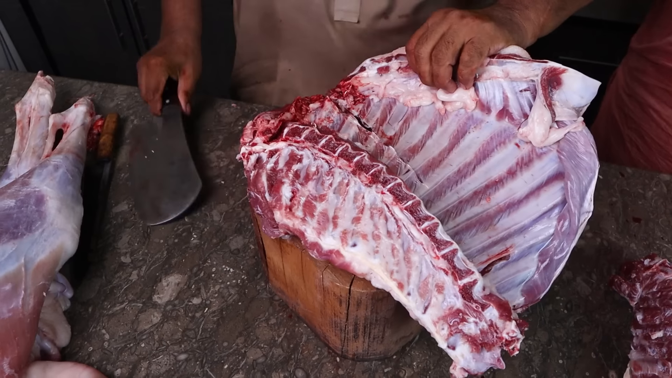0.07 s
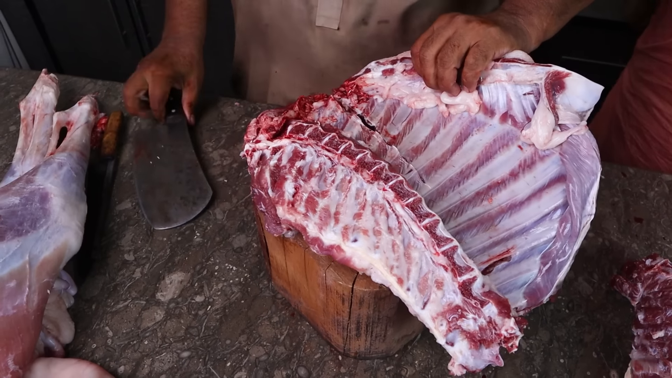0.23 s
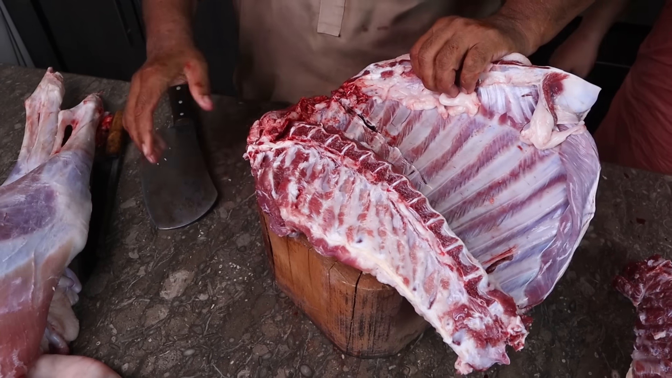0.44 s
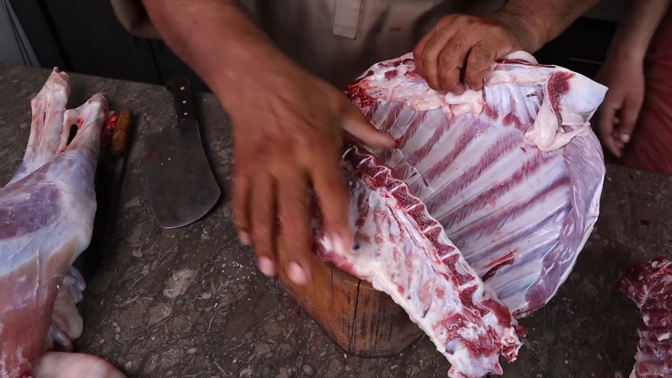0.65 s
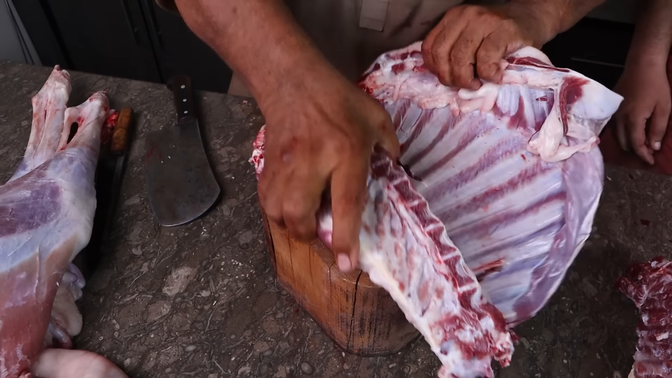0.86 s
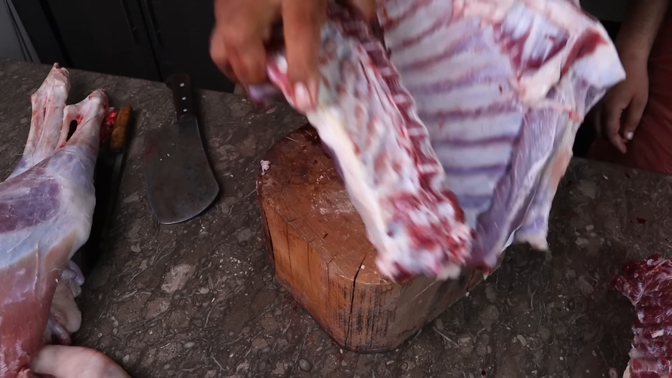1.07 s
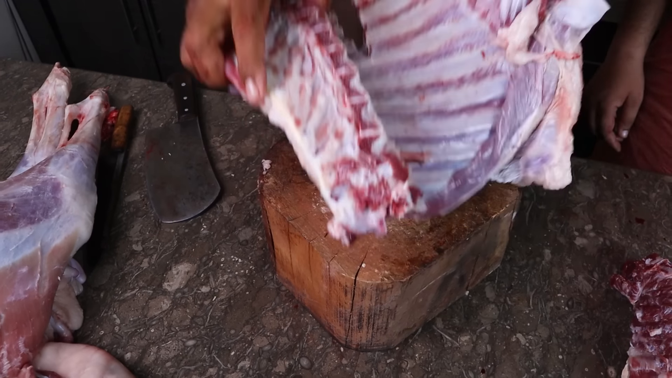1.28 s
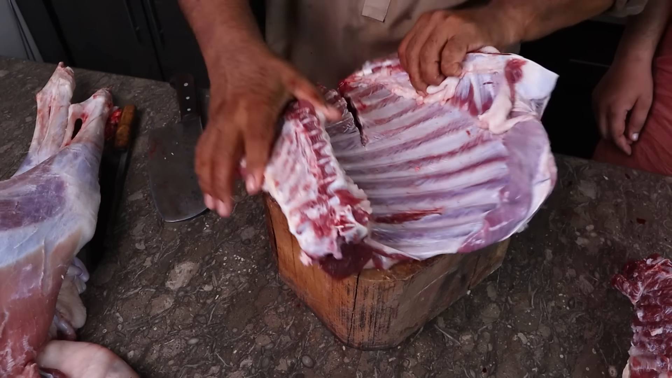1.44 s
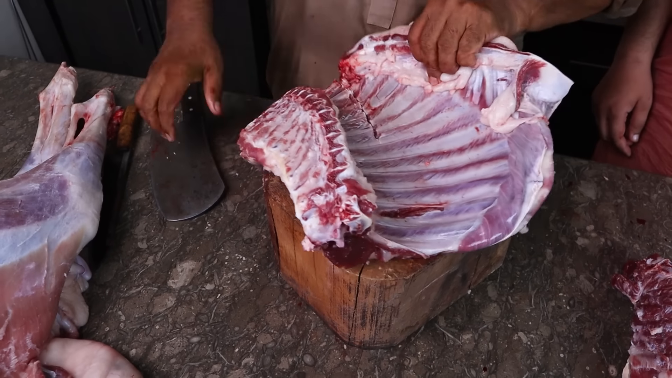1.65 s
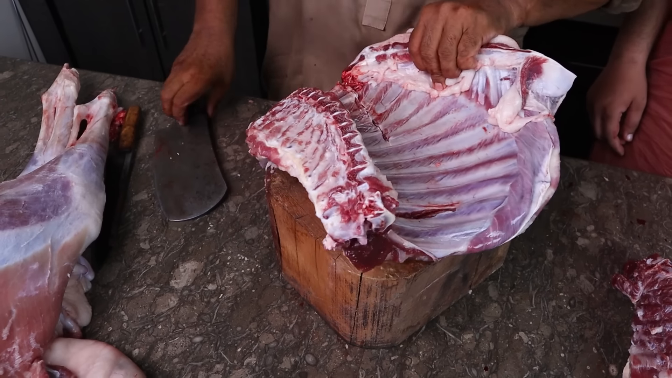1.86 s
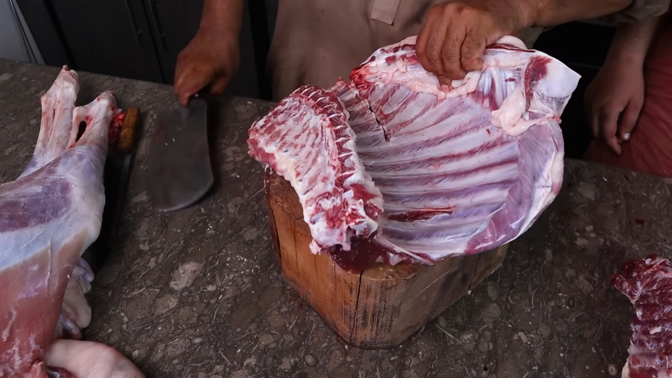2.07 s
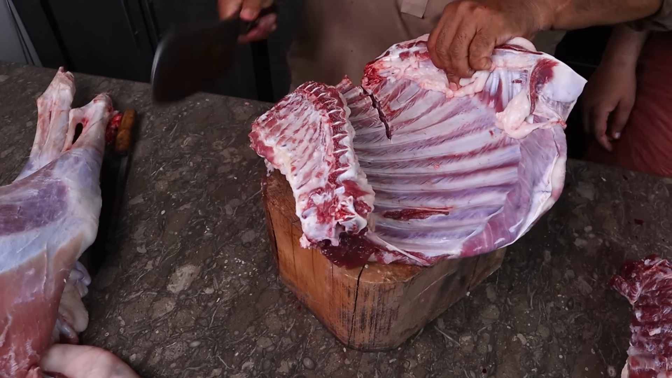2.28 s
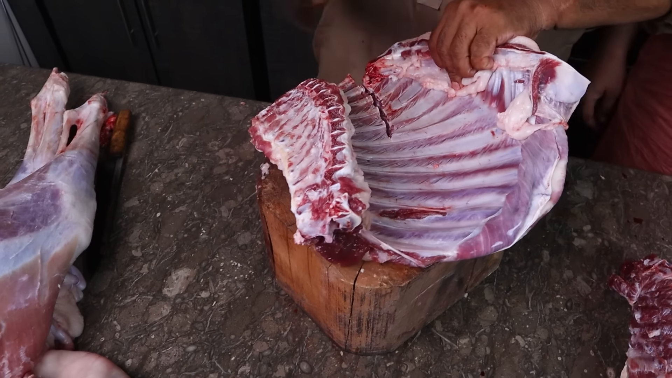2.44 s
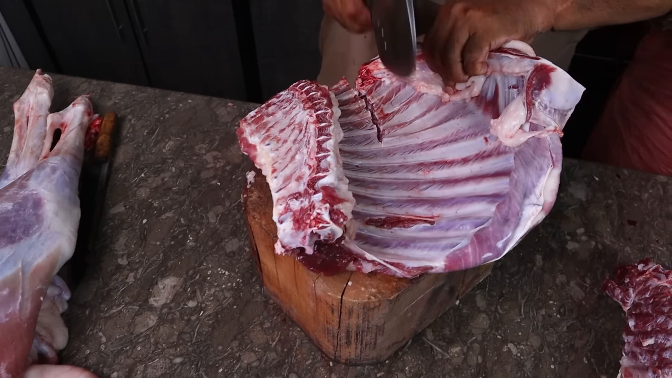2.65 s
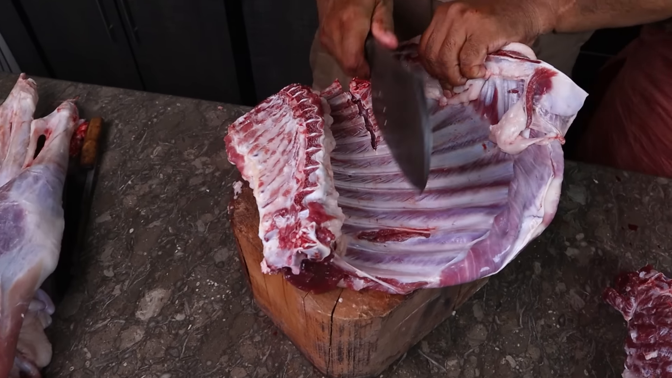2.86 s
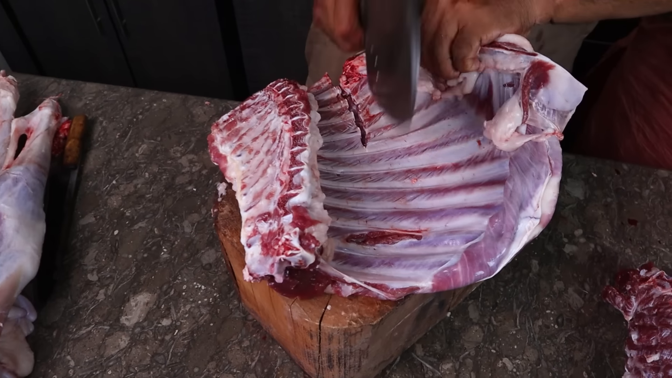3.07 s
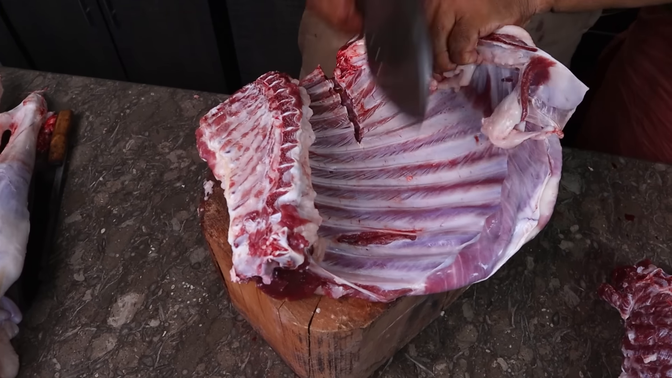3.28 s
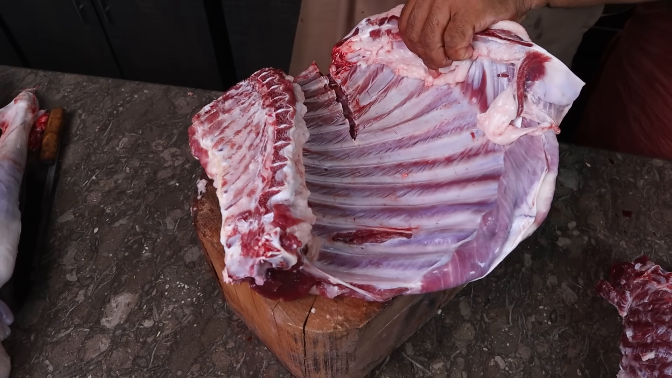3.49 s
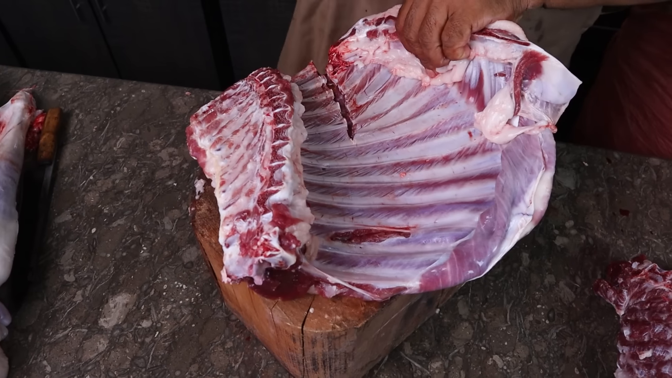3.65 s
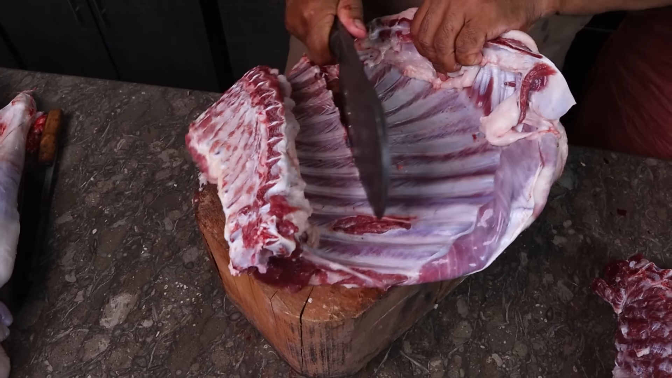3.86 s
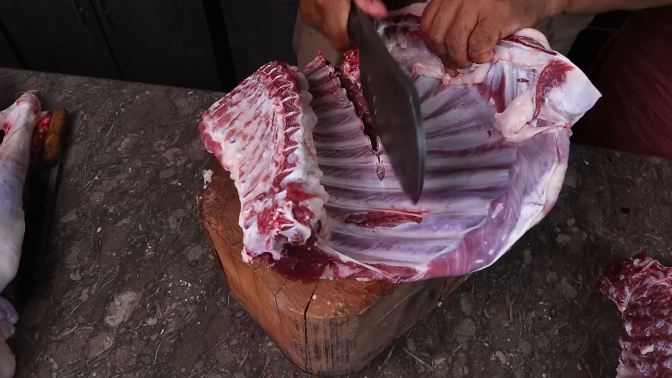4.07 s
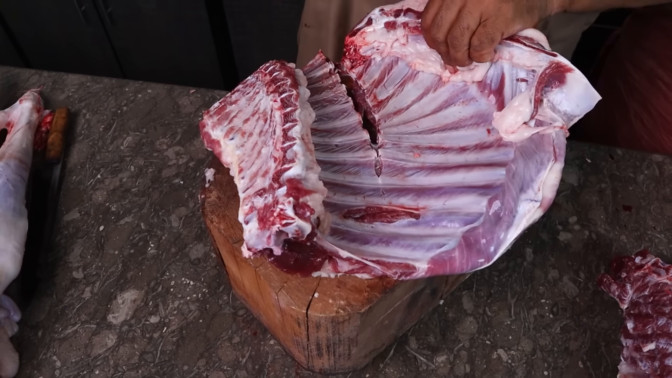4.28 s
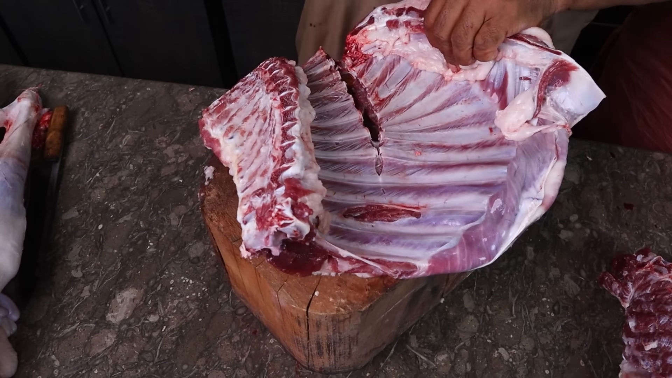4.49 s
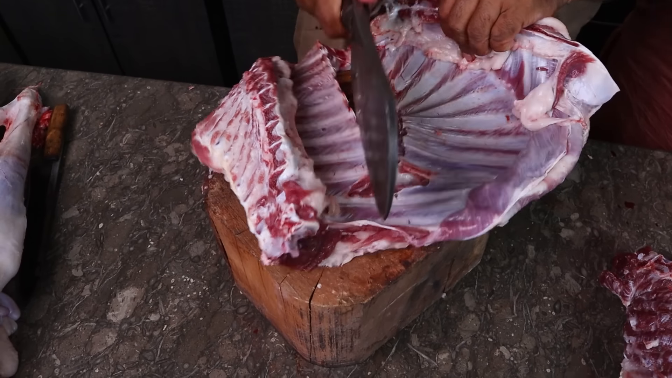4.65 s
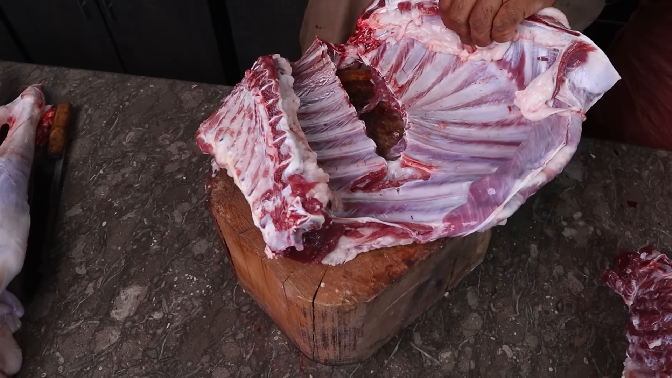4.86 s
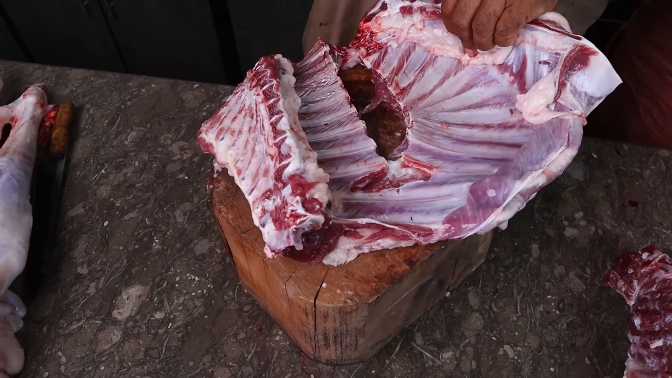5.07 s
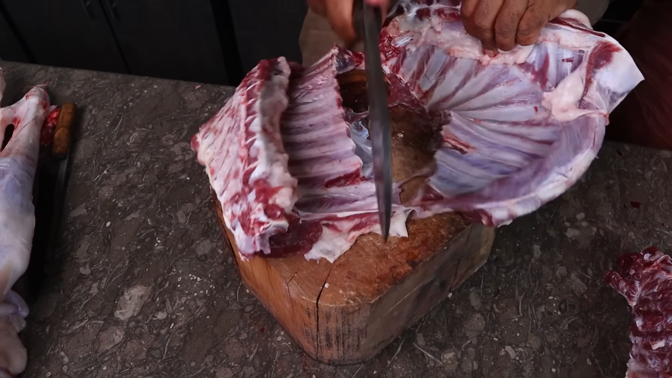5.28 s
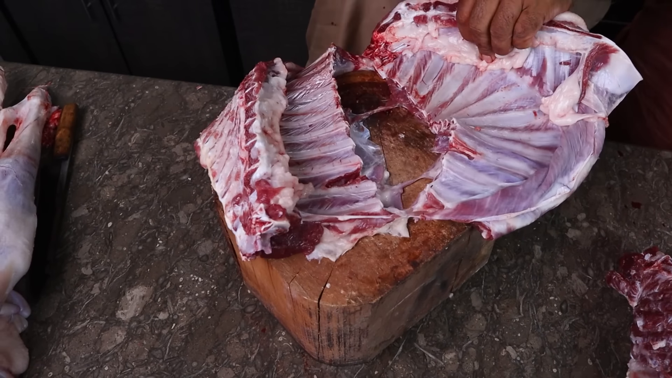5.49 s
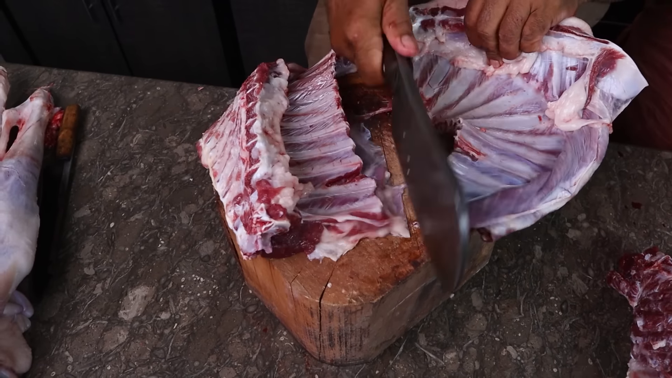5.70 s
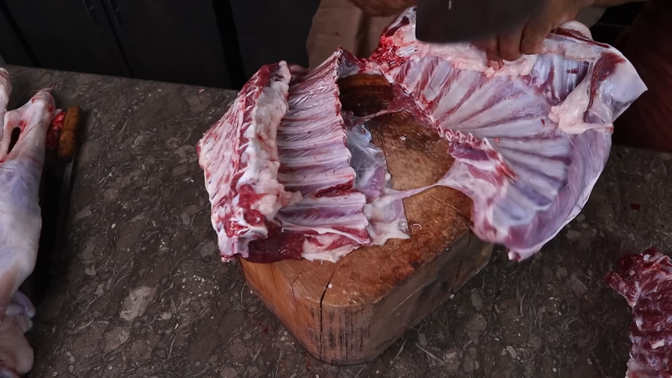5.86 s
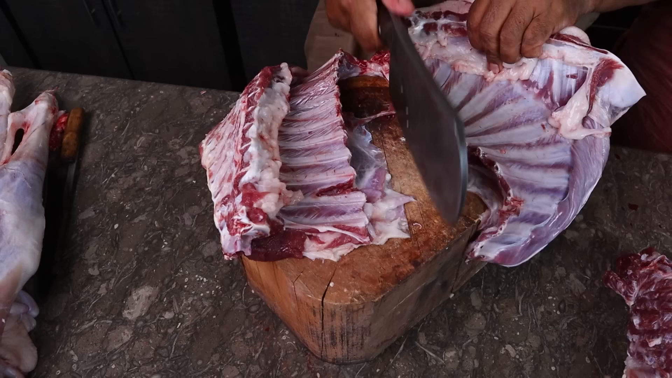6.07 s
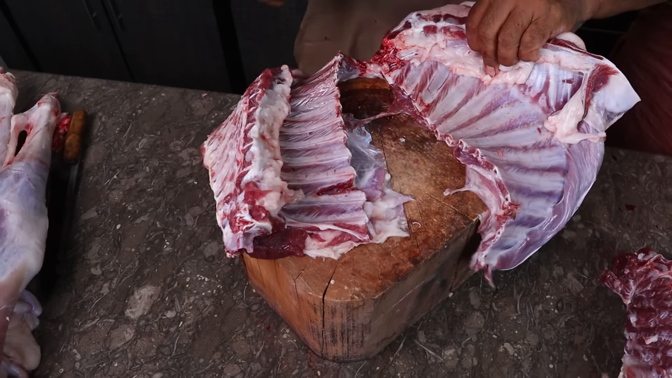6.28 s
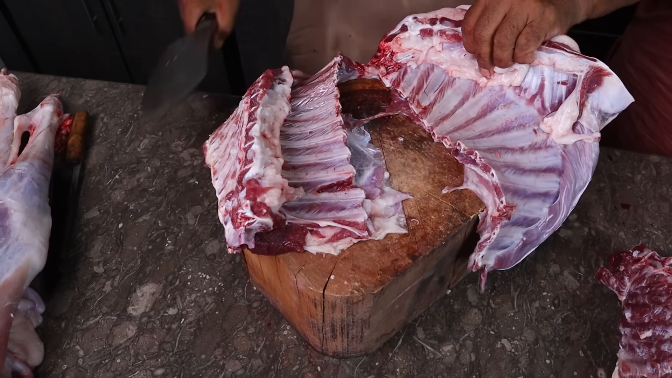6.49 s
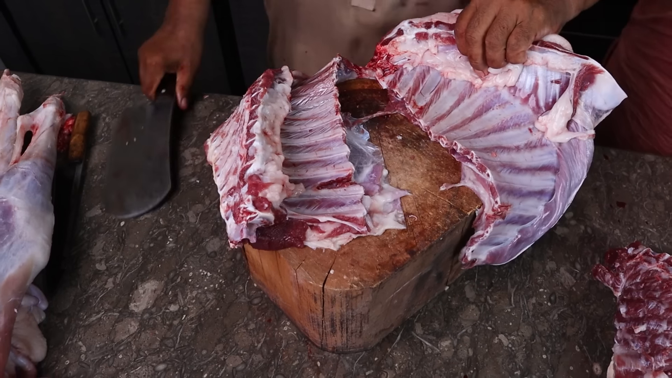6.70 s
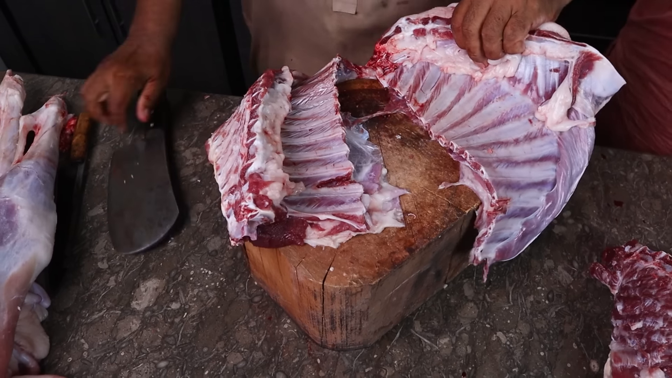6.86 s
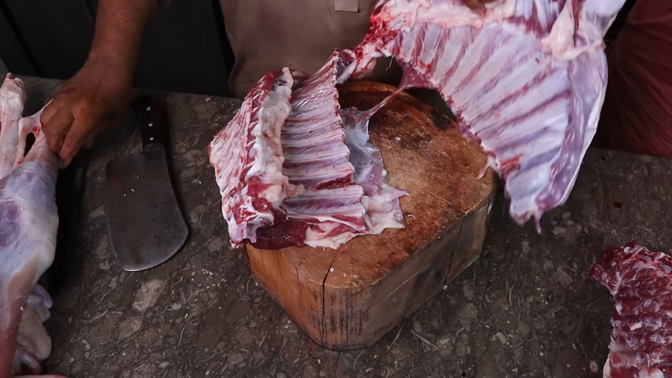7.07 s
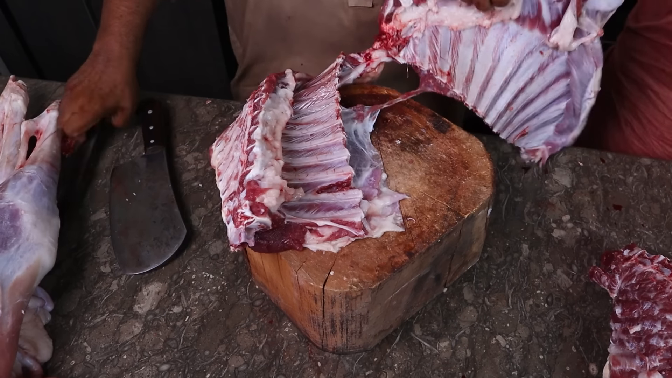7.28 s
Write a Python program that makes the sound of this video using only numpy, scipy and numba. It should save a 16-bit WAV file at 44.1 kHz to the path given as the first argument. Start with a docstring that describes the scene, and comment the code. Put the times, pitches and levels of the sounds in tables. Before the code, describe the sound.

Close up in a reverberant, hard-walled room, a butcher sets down a ringing cleaver, moves wet ribs with quiet squelches and picks the blade up again. After a faint thin whistle comes one light chop, then five heavy ones, each splintering bone and thudding into a wooden block, the last ones hollower. The cleaver finally clatters onto the bench. A distant wash of street noise runs underneath.

```python
"""Chopping ribs on a butcher's block

Close microphone at the bench, in a hard-walled room with a street faint outside. A butcher lays down
a heavy cleaver, shifts a rack of ribs, chops through it in six strokes and lays the cleaver down again.
Each stroke cracks bone and drives into the wooden block: a dull thump through meat, a hollow knock on
bare wood. The steel and the room ring on; gain control flattens the blows and ducks the background."""
import sys
import numpy as np
from scipy import signal
from scipy.fft import rfft, irfft
from scipy.io import wavfile
from numba import njit

SR = 44100
rng = np.random.default_rng(int(sys.argv[2]) if len(sys.argv) > 2 else 0)


def wav_out(sig):
    """Save sig, one row per channel (or a flat mono array), as 16-bit PCM at SR to the path in sys.argv[1]."""
    wavfile.write(sys.argv[1], SR, np.round(np.clip(np.atleast_2d(sig).T, -1, 1) * 32767).astype(np.int16))


N = 323416

# The six strokes. Each row: start in seconds, force on the block in dB, cushion of meat under the edge
# from 0 to 1, bone crack in dB, crack length in seconds, blade ring in dB.
STROKES = [(3.2817, -23.5, 1, -22.5, 0.0024, -42), (3.9320, 3, 0.79, -4.5, 0.0021, -32),
           (4.7067, 5.5, 0.66, -10.5, 0.016, -48), (5.3328, 5, 0.29, -15.5, 0.0049, -46),
           (5.8494, 4, .1, -12, 0.0022, -54), (6.18, 1.5, 0.15, -22, .002, -36)]
# Modes of the steel blade. Each row: pitch in Hz, relative level in dB, 60 dB decay time in seconds.
BLADE_MODES = [(1292, -3, .3), (2075, 0, .27), (4190, -5.5, .22), (4793, 4.5, .34), (5380, -10, .28),
               (6732, -7, .26), (10822, -6, .22), (12903, -4.5, .24), (1464, -11, .25), (1680, -8, .25),
               (2035, -3, .2), (2832, -6, .22), (3155, -9, .25), (3424, -10, .2), (4958, -7, .18),
               (5800, -12, .15), (6971, -12, .22), (7560, -12, .2), (8936, -11, .15), (9820, -14, .2),
               (11560, -14, .2)]
# Bright colour of splinters, crackle and chatter. Each row: frequency in Hz, gain in dB.
SPLINTER_COLOUR = [(100, -55), (800, 5.5), (2000, 14.5), (3200, 11), (5300, 9.5), (8000, 4), (12000, 5),
                   (16000, -11)]


def chops():
    """The edge splinters through to the block; meat under it swells the thump and muffles the knock."""
    # A blow through meat, and one on bare wood. Each row: frequency in Hz, gain in dB.
    thump_colour = [(30, -65), (60, -17.5), (110, -2), (180, 3.5), (260, -1), (360, -2.5), (550, -10.5),
                    (1000, -16.5), (2000, -37.5), (6000, -35), (16000, -66)]
    knock_colour = [(40, -36.5), (150, -18), (300, -5.5), (420, 4), (560, 3.5), (720, 0), (1000, -4),
                    (1800, -11.5), (3000, -23), (6000, -46.5), (16000, -43)]
    # The block bouncing on the bench, and the wood's own modes.
    # Each row: pitch in Hz, relative level in dB, 60 dB decay time in seconds.
    bench_modes = [(71, -9, 0.26), (104.75, -7, 1), (141.6, 2, 0.3), (180, -1.5, 0.16), (197.5, -3, 0.21),
                   (229, -21, 0.34), (271, 4.5, 0.36), (353, 6, 0.12), (384, -0.5, 0.2)]
    block_modes = [(275, -5, .5), (404, -2, .14), (522, 0, .3), (543, -1, .26), (590, -2, .14),
                   (633, 1, .14), (720, 1, .14), (764, -3, .2), (833, -4, .14), (1033, -7, .14),
                   (1253, -8, .18)]
    out = np.zeros(N)
    for at, force_db, cushion, crack_db, length, _ in STROKES:
        landing = at + travel_time(cushion)
        splinter_db = crack_db - 8.5
        splinters = colour(fracture(length, unevenness=.3), SPLINTER_COLOUR)
        add(out, at, blow(splinters, splinter_db))
        # chips of bone and wet fibres patter after the edge
        patter = colour(fracture(.025, unevenness=.3), SPLINTER_COLOUR)
        add(out, landing, blow(patter, splinter_db - 3.9))
        thump = blow(colour(rattle(t60=0.089), thump_colour), 0)
        thump += blow(ring(bench_modes, unevenness=0.18), -3.5)
        knock = blow(colour(rattle(t60=0.15), knock_colour), 0)
        knock += blow(ring(block_modes, unevenness=0.058), -4.5)
        thump_db, knock_db = -12.5 + 14 * cushion, -6.5 * cushion
        add(out, landing, undb(force_db) * (thump * undb(thump_db) + knock * undb(knock_db)))
    return out


def travel_time(cushion):
    """Seconds from first touch until the edge meets the block; more meat takes longer."""
    return .0007 + .0043 * cushion


def bone_cracks():
    """The ribs snap as the edge first meets them."""
    out = np.zeros(N)
    for at, _, _, crack_db, length, _ in STROKES:
        snaps = fracture(length, unevenness=.3)
        add(out, at, blow(bandpass(snaps, hz=1850, q=1.4), crack_db))
    return out


def bench_contacts():
    """The cleaver always settles the same way: edge, its bounce, handle, its bounce."""
    # The cleaver is laid down. Each row: start in seconds, level in dB.
    set_downs = [(0.2257, -2), (6.7948, 1.5)]
    # Its four touches. Each row: delay in seconds, clack in dB, blade ring in dB,
    # tilt of the ring in dB per octave, handle thud in dB.
    touches = [(0, -16.5, -19, -1.5, -34.5), (.029, -29, -21, 1.5, -33.5), (.2, -40.5, -28.5, -2, -14.5),
               (.24, -36, -28.5, -4.5, -23.5)]
    return [(at + delay, db + clack_db, db + ring_db, tilt, db + thud_db)
            for at, db in set_downs for delay, clack_db, ring_db, tilt, thud_db in touches]


def set_down():
    """The blade clacks and its vibrating steel chatters on the bench; the handle drops after it."""
    # Blade and handle striking the bench. Each row: frequency in Hz, gain in dB.
    clack_colour = [(40, -6), (200, -24.5), (450, 9), (800, 4), (1400, -1), (2500, -2.5), (4000, -11),
                    (7000, -12.5), (12000, -27), (16000, -64)]
    handle_colour = [(40, -50), (110, -13), (200, 0.5), (370, 0.5), (560, -8.5), (1200, -15.5), (2500, -21),
                     (16000, -39)]
    out = np.zeros(N)
    for at, clack_db, ring_db, _, thud_db in bench_contacts():
        add(out, at, blow(colour(rattle(t60=0.037), clack_colour), clack_db))
        chatter = colour(fracture(.07, unevenness=.4), SPLINTER_COLOUR)
        add(out, at, blow(chatter, ring_db - 13))
        add(out, at, blow(colour(rattle(t60=0.13), handle_colour), thud_db))
    return out


def blade_ring():
    """The blade rings freely on the bench; after a stroke, meat smothers its low modes."""
    out = np.zeros(N)
    for at, _, ring_db, tilt, _ in bench_contacts():
        modes = [(hz, db + tilt * np.log2(hz / BLADE_MODES[0][0]), t60) for hz, db, t60 in BLADE_MODES]
        # each mode beats with a weaker twin just above it
        twins = [(hz + 19, db - 10, t60) for hz, db, t60 in modes]
        add(out, at, blow(ring(modes + twins, unevenness=.15), ring_db))
    high_modes = [(hz, db, t60) for hz, db, t60 in BLADE_MODES if hz > 4500]
    for at, _, cushion, _, _, ring_db in STROKES:
        grip_s = 0.029 * (1 - cushion) ** 2  # bare wood holds the edge before the blade can ring
        freed = at + travel_time(cushion) + grip_s
        add(out, freed, blow(ring(high_modes, unevenness=.15), ring_db))
    # the blade rocks, so its ring flutters
    return out * np.exp(.25 * wander(per_second=70))


def shifting_ribs():
    """Wet meat peels off the wood and the ribs creak; meat and hands bump softly on the block."""
    # Each row: start in seconds, length in seconds, level in dB, bright crackle in dB relative to that.
    squelches = [(1.1, 0.011, -31, -10), (1.118, 0.026, -35, -1), (1.473, 0.011, -43.5, -12),
                 (1.559, 0.01, -36.5, -3.5), (1.597, 0.0049, -51, 7.5), (2.944, 0.0024, -40, -20),
                 (5.233, .0033, -49, -14)]
    # Each row: start in seconds, level in dB, centre in Hz.
    bumps = [(.775, -36.5, 120), (1.468, -42.5, 258), (1.876, -33, 284), (2.250, -35.5, 590),
             (2.868, -36, 102), (5.236, -33, 138)]
    out = np.zeros(N)
    for at, length, db, crackle_db in squelches:
        snaps = fracture(length, unevenness=0.55)
        add(out, at, blow(bandpass(snaps, hz=1640, q=1.03), db))
        add(out, at, blow(colour(snaps, SPLINTER_COLOUR), db + crackle_db))
    for at, db, hz in bumps:
        add(out, at, blow(bandpass(rattle(t60=0.09), hz, q=1.4), db))
    return out


def handling():
    """Hand and blade slide with a faint hiss; the lifted blade scrapes off the bench and rings."""
    # Each row: start in seconds, length in seconds, level in dB, centre in Hz.
    slides = [(.074, .12, -55, 12800), (2.013, 0.28, -46, 12200), (2.518, 0.25, -49.5, 9700),
              (6.476, .44, -46, 13240)]
    lift_at, lift_s = 2.096, .28
    out = np.zeros(N)
    for at, length, db, hz in slides:
        add(out, at, swish(length, db, hz, width_hz=2500))
    add(out, lift_at, swish(lift_s, db=-40, hz=4450, width_hz=6000))
    add(out, lift_at + lift_s / 2, blow(ring(BLADE_MODES, unevenness=0.44), -52))
    return out


def whistle():
    """One faint, thin whistle just before the first stroke."""
    # In order: start in seconds, length in seconds, level in dB, centre in Hz, width in Hz.
    note = (3, 0.2, -40.5, 2954, 86)
    out = np.zeros(N)
    add(out, note[0], swish(*note[1:]))
    return out


def room(x):
    """Hard walls give dense reflections whose bass builds late and stays longest, and one dull echo."""
    # Colour of the reverberation. Each row: frequency in Hz, gain in dB.
    tail_colour = [(60, -2.5), (160, 3), (350, -2.5), (700, 1.5), (1500, -3.5), (2500, -4.5), (5000, -2),
                   (14000, -11)]
    # Echo off the far wall. In order: delay in seconds, level in dB, upper edge in Hz.
    far_wall = (0.21, -20.5, 256)
    bass_t60_s, shortening_per_octave, air_absorption_hz = 0.82, 0.075, 21000
    t = clock(1.4)
    spectrum = rfft(rng.standard_normal(len(t)))
    octave = np.log2(np.clip(np.arange(len(spectrum)) * SR / len(t), 125, 16000) / 125)
    tail = 0
    for k in range(8):
        hz = 125 * 2 ** k
        t60 = bass_t60_s * 2 ** (-shortening_per_octave * k) / (1 + (hz / air_absorption_hz) ** 2)
        build_s = 0.0032 + 1.0 / hz
        envelope = np.exp(-np.log(1000) * t / t60) * (1 - np.exp(-(t / build_s) ** 2))
        band = irfft(spectrum * np.maximum(1 - np.abs(octave - k), 0), len(t))
        tail = tail + band * envelope / np.linalg.norm(envelope)
    wet = signal.fftconvolve(x, colour(tail, tail_colour))[:N]
    delay, echo_db, edge_hz = far_wall
    echo = signal.sosfilt(signal.butter(4, edge_hz, fs=SR, output="sos"), x)
    add(wet, delay, undb(echo_db) * echo)
    return wet


def street():
    """The street outside: a distant wash whose level wanders slightly, with thin, far-off chirring."""
    # Each row: frequency in Hz, gain in dB.
    wash_colour = [(25, -40), (60, -4), (110, -1), (200, -4.5), (290, -5), (390, 1), (520, -6), (900, -5),
                   (1500, -10), (2500, -18), (4300, -27.5), (7000, -32), (11000, -34), (16000, -43)]
    # Each row: centre in Hz, width in Hz, level in dB.
    chirrs = [(3378, 100, -68), (5920, 300, -71)]
    wash = colour(rng.standard_normal(N), wash_colour)
    chirring = sum(hiss(hz, width_hz) * undb(db) for hz, width_hz, db in chirrs)
    wash_db = -41 + 1.15 * wander(per_second=5.41)
    return wash / np.std(wash) * undb(wash_db) + chirring


def ring(modes, unevenness):
    """Decaying modes; their strengths and signs vary with where the blow lands, drawn at random."""
    t = clock(1.2)
    chance = rng.standard_normal((len(modes), 2))
    out = np.zeros(len(t))
    for (hz, db, t60), (spot, side) in zip(modes, chance):
        strength = np.sign(side) * undb(db) * np.exp(unevenness * spot)
        out += strength * np.exp(-np.log(1000) * t / t60) * np.sin(2 * np.pi * hz * t)
    return out


def rattle(t60):
    """A blow spread over many heavily damped resonances, with an even spectrum."""
    t = clock(1.2)
    fade = np.exp(-np.log(1000) * t / t60)
    spectrum = rfft(rng.standard_normal(len(t)) * fade)
    return irfft(spectrum / np.abs(spectrum), len(t)) * np.sqrt(fade)


def fracture(length, unevenness):
    """A short run of tiny snaps of unequal size, 16 samples each."""
    t = clock(.3)
    sizes = np.repeat(rng.standard_normal(len(t)), 16)[:len(t)]
    return rng.standard_normal(len(t)) * np.exp(unevenness * sizes - (t / length) ** 2)


def swish(length, db, hz, width_hz):
    """A band of hiss that swells and fades."""
    swell = np.hanning(int(length * SR))
    return blow(hiss(hz, width_hz)[:len(swell)] * swell, db)


def hiss(hz, width_hz):
    """A band of fluttering noise."""
    band = bandpass(rng.standard_normal(N), hz, q=hz / width_hz)
    return band / np.std(band) * np.exp(0.86 * wander(per_second=27))


def wander(per_second):
    """A level that glides from one random value to the next."""
    return np.interp(np.arange(N) / SR * per_second, np.arange(1000), rng.standard_normal(1000))


def bandpass(x, hz, q):
    """The same resonance twice in series, gain 1 at its centre."""
    peak = signal.iirpeak(hz, q, fs=SR)
    return signal.lfilter(*peak, signal.lfilter(*peak, x))


def colour(x, points, size=4096):
    """Minimum-phase filter through (Hz, dB) points joined on a log-frequency axis."""
    hz, db = np.transpose(points)
    bin_hz = np.maximum(np.arange(size // 2 + 1) * SR / size, 1)
    gain = undb(np.interp(np.log(bin_hz), np.log(hz), db))
    cepstrum = irfft(np.log(gain))
    cepstrum[1:size // 2] *= 2
    cepstrum[size // 2 + 1:] = 0
    impulse = irfft(np.exp(rfft(cepstrum)))
    return signal.fftconvolve(x, impulse)[:len(x)]


def blow(x, db):
    """Scale a short sound to the energy of 10 ms at this level."""
    return x * undb(db) * np.sqrt(SR / 100 / np.sum(x ** 2))


def add(out, at, x):
    """Mix a sound in at a time in seconds."""
    i = int(at * SR)
    out[i:i + len(x)] += x[:len(out) - i]


def undb(db):
    """Decibels to gain."""
    return 10 ** (np.asarray(db) / 20)


def clock(seconds):
    """Sample times of a stretch."""
    return np.arange(int(seconds * SR)) / SR


@njit
def follow(x, attack, release):
    """Peak follower with a quick rise and a slow fall."""
    out, level = np.empty(len(x)), 0.
    for i in range(len(x)):
        level += (abs(x[i]) - level) * (attack if abs(x[i]) > level else release)
        out[i] = level
    return out


def hold_down(x, threshold, attack_s, release_s):
    """Turn the gain down while the followed level is over the threshold."""
    envelope = follow(x, 1 / (attack_s * SR), 1 / (release_s * SR))
    return x / np.maximum(envelope / threshold, 1)


def scene():
    """The bench up close, the room around it and the street beyond, in mono."""
    work = chops() + set_down() + blade_ring() + shifting_ribs() + handling() + whistle()
    bone = bone_cracks()
    # the cut opens towards the microphone, so less of the crack reaches the room
    reverberation = room(work + undb(-11) * bone)
    return (work + bone + reverberation + street())[None]


def record(dry):
    """Slow gain control ducks after each blow, a fast limiter catches peaks; deep bass and top are cut."""
    # Response of the close microphone. Each row: frequency in Hz, gain in dB.
    microphone = [(20, -33), (45, 0.5), (80, 0.5), (12500, -2), (14500, -6), (16000, -23)]
    low_cut = signal.butter(2, 55, "high", fs=SR, output="sos")
    high_cut = signal.ellip(8, .2, 70, 15600, fs=SR, output="sos")
    ducked = hold_down(dry[0], threshold=0.31, attack_s=0.013, release_s=0.7)
    limited = hold_down(ducked, threshold=.7, attack_s=.00004, release_s=.006)
    coloured = colour(signal.sosfilt(low_cut, limited), microphone)
    return signal.sosfilt(high_cut, coloured)[None]


dry = scene()
out = record(dry)
wav_out(out)
```